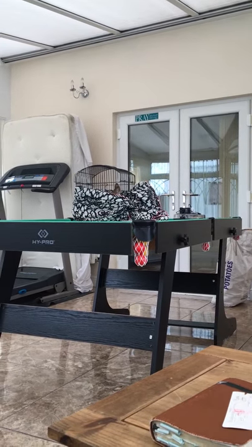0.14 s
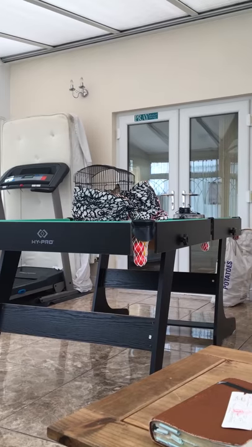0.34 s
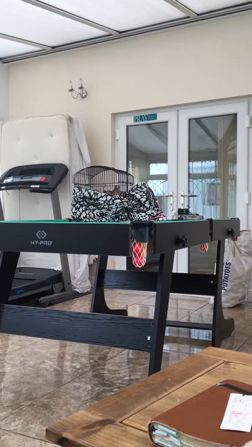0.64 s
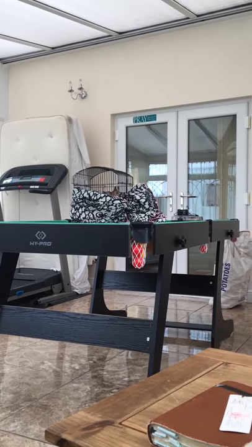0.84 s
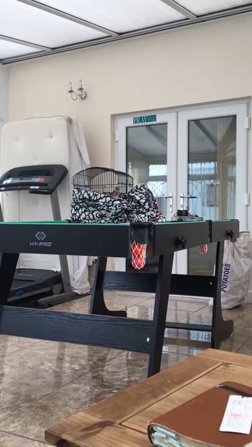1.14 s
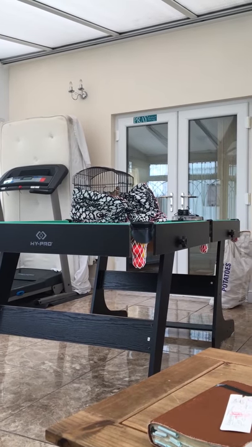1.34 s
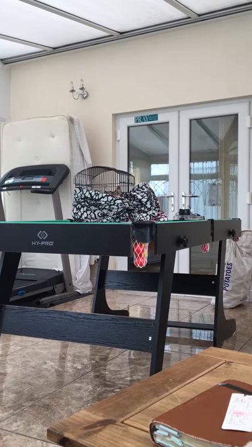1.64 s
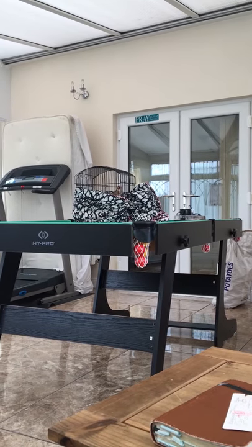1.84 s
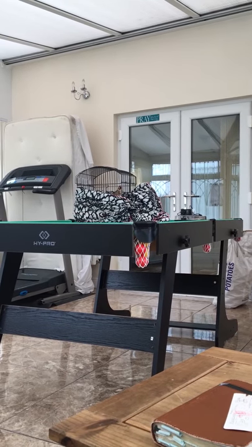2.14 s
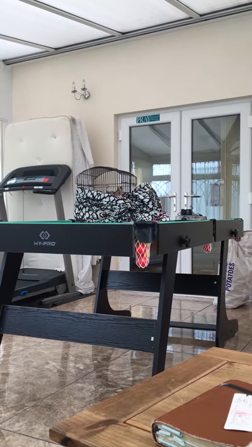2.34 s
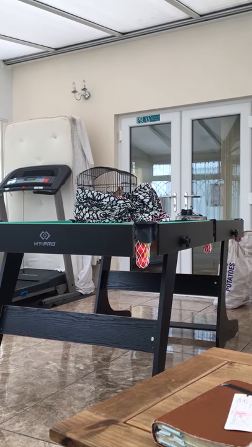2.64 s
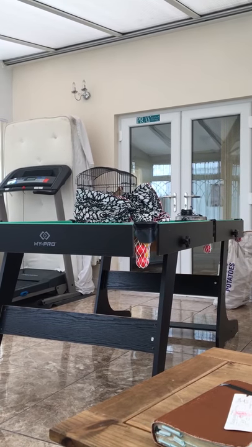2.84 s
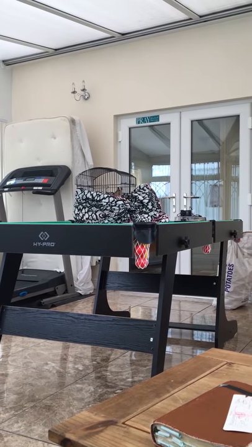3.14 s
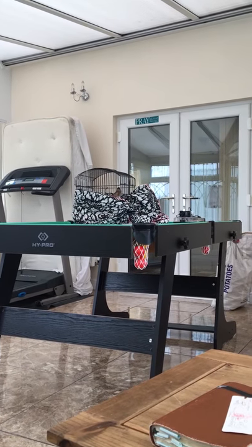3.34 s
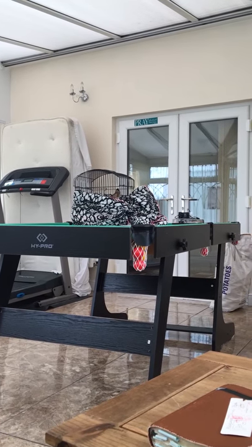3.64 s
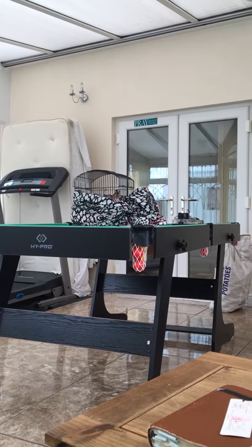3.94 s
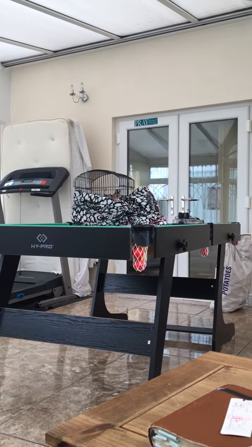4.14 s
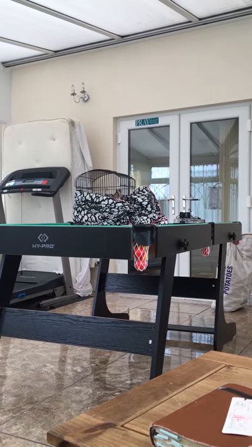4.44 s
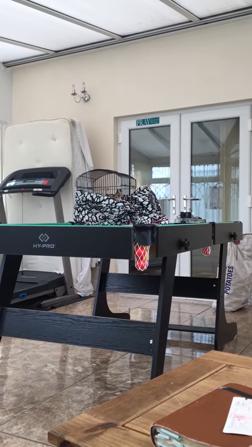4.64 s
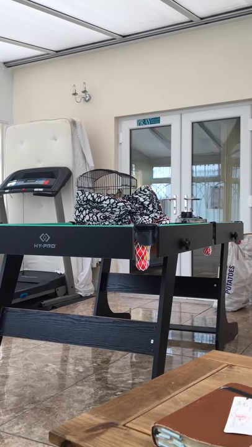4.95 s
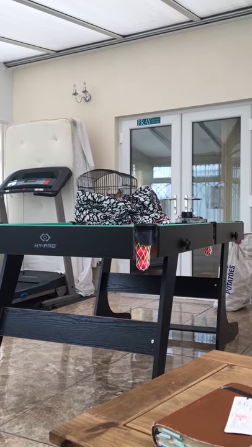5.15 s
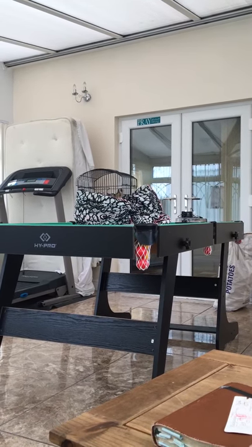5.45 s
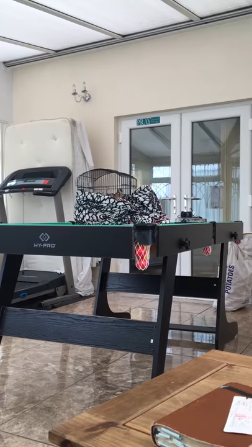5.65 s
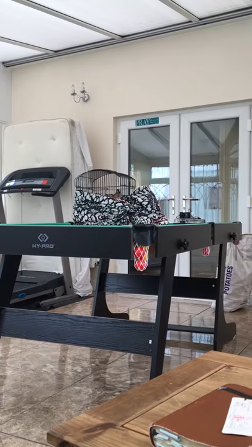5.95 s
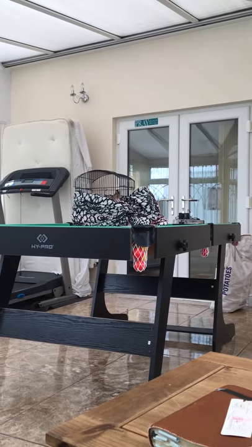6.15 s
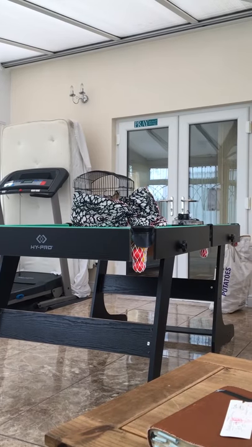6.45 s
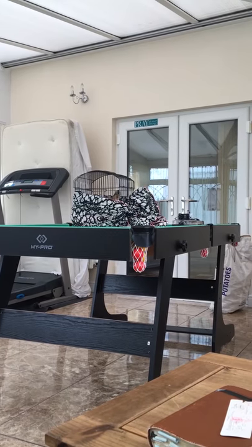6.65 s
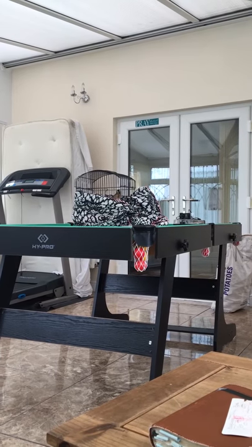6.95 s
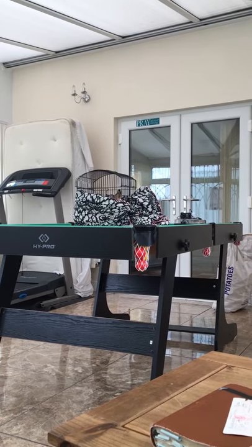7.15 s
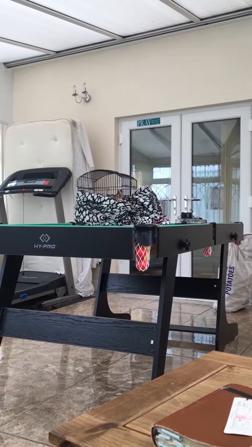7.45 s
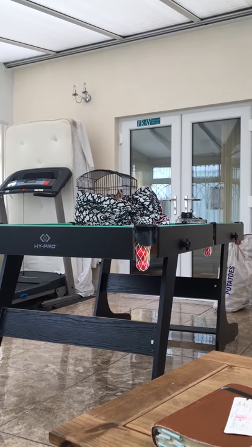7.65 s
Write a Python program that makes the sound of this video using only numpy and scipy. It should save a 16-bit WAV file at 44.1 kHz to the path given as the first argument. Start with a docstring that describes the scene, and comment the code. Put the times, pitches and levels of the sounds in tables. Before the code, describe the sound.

A caged finch sings quick chirps, twitters, trills and buzzes in a room, over a low rumble, with one dull knock.

```python
"""Caged goldfinch under a glass roof

A goldfinch sings a few metres from the microphone in a tiled, glass-roofed room. The two sides
of its syrinx, alone or together, give chirps, two-voiced notes, slurred whistles, a trill and
buzzes. Something knocks once across the room, over a low rumble and a faint hum."""
import sys
import numpy as np
from scipy import signal
from scipy.fft import rfft, irfft
from scipy.io import wavfile
from scipy.ndimage import map_coordinates

SR = 44100
rng = np.random.default_rng(int(sys.argv[2]) if len(sys.argv) > 2 else 0)


def to_wav(s):
    """Save 16-bit WAV."""
    ch = np.atleast_2d(s).T  # columns
    pcm = np.round(np.clip(ch, -1, 1) * 32767)  # PCM
    wavfile.write(sys.argv[1], SR, pcm.astype(np.int16))


N = 343098


# radiation from the bill: frequency_hz, gain_db
BILL_RADIATION = [(1000, 1.5), (1800, -4), (3000, -3.5), (4500, -2), (5500, 0), (7000, 1), (8600, -6),
                  (10500, 1.5), (12500, 4.5), (15500, -5)]

def finch():
    """The whole song close up, as it leaves the bill."""
    notes = trill(count=8) + churrs(count=5) + [(s, tumble()) for s in TUMBLE_STARTS]
    for syllable, table in ((chirp, CHIRP_NOTES), (pair, PAIR_NOTES), (slur, SLUR_NOTES),
                            (squawk, SQUAWK_NOTES), (twitter, TWITTER_CALLS), (buzz, BUZZ_NOTES)):
        notes += [(s, syllable(*row)) for s, *row in table]
    song = np.zeros(N)
    for s, sound in notes:
        add(song, s, sound)
    return coloured(song, BILL_RADIATION)


def membrane(hz, jitter):
    """A vibration with unsteady pitch, as of one side of the syrinx: a complex near sine."""
    unsteady_hz = hz * (1 + jitter * wander(len(hz), 700))
    return np.exp(2j * np.pi * np.cumsum(unsteady_hz) / SR)


def voice(wave, level_db, overtone_db, release_s=0.0048, third_db=-8, difference_db=-13):
    """Airflow distorts the vibration: overtones, and sum and difference tones when both sides sound."""
    power = abs(wave) ** 2
    difference = gain_of(difference_db) * (power - power.mean())
    third = gain_of(third_db) * wave ** 3 / (1 + power.mean())
    distortion = wave ** 2 + difference + third
    t = np.arange(len(wave)) / SR
    attack_s = min(.012, 0.24 * t[-1])
    ramp = np.clip(np.minimum(t / attack_s, (t[-1] - t) / release_s), 0, 1)
    gate = np.sin(np.pi / 2 * ramp) ** 2
    return np.sqrt(2) * gate * gain_of(level_db) * (wave + gain_of(overtone_db) * distortion).real


# one-voiced chirps and pips: start_s, length_s, start_hz, end_hz, level_db, swell_db
CHIRP_NOTES = [ (.025, .015, 2930, 5190, -50, 17.5), (0.113, 0.047, 2500, 4520, -53.5, 34),
               (0.476, 0.038, 2440, 4156, -45.5, 7), (0.593, 0.017, 3230, 4710, -36, 0),
               (0.638, 0.039, 8220, 7830, -49, -11), (1.603, .02, 1780, 3830, -45, 13),
               (1.633, 0.025, 2850, 3880, -36, 6.5), (1.71, 0.012, 2860, 2560, -44.5, 5),
               (1.812, 0.016, 1493, 4275, -40, 17), (1.824, 0.043, 3420, 4990, -32, -5.5),
               (1.937, 0.053, 2190, 3756, -45.5, 28), (2.025, 0.022, 1565, 6820, -40.5, 11.5),
               (2.231, 0.012, 5076, 5076, -21.5, 2), (2.292, .021, 2566, 4670, -32.5, 7),
               (2.432, 0.0052, 4630, 6760, -42.5, -16), (3.652, 0.017, 2180, 5100, -37.5, 19),
               (3.664, .029, 5486, 5512, -31, 11), (3.753, 0.044, 2005, 3310, -46, 20),
               (3.785, 0.024, 3150, 4760, -30.5, -2), (3.831, 0.02, 4800, 7740, -44.5, 0),
               (4.346, .04, 3340, 6670, -37.5, 0.5), (4.461, 0.026, 2680, 3717, -32.5, 2),
               (4.554, .11, 1970, 2490, -48.5, 8.5), (4.713, 0.016, 2940, 4800, -33.5, 5.5),
               (4.827, 0.0091, 1880, 5170, -35, 10), (5.08, 0.033, 5170, 5480, -36.5, -3),
               (5.492, 0.053, 2192, 3140, -39, -1), (5.58, 0.024, 2660, 4660, -32.5, -1.5),
               (5.8, 0.0407, 2360, 3220, -38, -0.5), (6.419, 0.045, 4630, 7580, -42.5, 1.5)]

def chirp(length_s, start_hz, end_hz, db, swell_db, overtone_db=-25.5):
    """A quick glide whose pitch follows breath: an even chirp moves early, a strongly swelling one late."""
    u = progress(length_s)
    hz = glide(u, start_hz, end_hz, bend=1.5 * 2 ** (-swell_db / 23.5))
    jitter = min(.002 + .05 * abs(np.log(end_hz / start_hz)), .028)  # wide glides are the roughest
    level_db = db + swell_db * (u - .5) + 2 * wander(len(u), 253)
    pressed_db = 22 * min(np.log2(end_hz / 4850), .35)  # higher chirps are pressed harder
    return voice(membrane(hz, jitter), level_db, overtone_db + pressed_db, release_s=0.0027)


# two-voiced notes: start_s, length_s, upper_start_hz, upper_end_hz, lower_start_hz, lower_end_hz,
# lower_relative_db, level_db, swell_db
PAIR_NOTES = [ (0.238, 0.037, 5660, 5890, 4140, 5080, 6.5, -55.5, -17),
              (0.375, .022, 4140, 5600, 3350, 4660, 3.5, -50, 6),
              (.686, 0.0504, 7500, 6350, 5930, 4924, 1.5, -43, 22.5),
              (1.529, 0.04, 7440, 6030, 5600, 4600, 2, -47, 15),
              (1.772, 0.014, 7300, 7200, 5600, 5750, 0, -49.5, -1),
              (4.766, 0.0245, 7770, 6550, 5580, 5600, -12, -39.5, 6),
              (5.629, 0.0497, 8640, 6340, 6560, 4930, -13, -37.5, 9),
              (5.732, 0.026, 5200, 5513, 4560, 4400, -4.5, -32, 4),
              (7.576, 0.022, 6470, 6870, 5910, 5910, -3.5, -42, 13),
              (7.695, 0.027, 5900, 6550, 4410, 5170, 6, -47, -3)]

def pair(length_s, start_hz, end_hz, low_start_hz, low_end_hz, low_db, db, swell_db,
         bend=2.56, overtone_db=-23):
    """Both sides of the syrinx glide at once; the lower is less steady and settles later."""
    u = progress(length_s)
    upper = membrane(glide(u, start_hz, end_hz, bend), jitter=0.0048)
    lower = membrane(glide(u, low_start_hz, low_end_hz, 0.65 * bend), jitter=0.0091)
    wave = upper + gain_of(low_db) * lower
    return voice(wave, db + swell_db * (u - .5), overtone_db, difference_db=-18)


# slurred whistles: start_s, length_s, start_hz, end_hz, bend, level_db, swell_db, warble_depth_hz
SLUR_NOTES = [(2.078, .126, 5730, 5088, 1.6, -29.5, 12.5, 5), (3.863, 0.091, 8730, 6235, 2.1, -37, 5.5, 66),
              (4.0, 0.13, 4490, 2627, .85, -36.5, -9, 233),
              (4.116, 0.16, 2568, 2290, 1.56, -45.5, -6.5, 395.5),
              (4.873, .088, 2315, 3670, 1.1, -47.5, -11, 237), (4.963, 0.074, 3530, 4750, 0.77, -34, 3, 68),
              (7.303, 0.11, 4250, 3896, 1.02, -34, 3, 5)]

def slur(length_s, start_hz, end_hz, bend, db, swell_db, depth_hz):
    """A whistle that slides one way under an arch of loudness."""
    u = progress(length_s)
    arch_db = -3 * (2 * u - 1) ** 2
    return whistle(glide(u, start_hz, end_hz, bend), db + swell_db * (u - .5) + arch_db, depth_hz)


def whistle(hz, db, depth_hz, warble_hz=211):
    """A long tone, pure or burred by a fast warble."""
    warble = membrane(np.full(len(hz), warble_hz), jitter=0.088).real
    tone = membrane(hz + depth_hz * warble, jitter=.0008)
    return voice(tone, db, overtone_db=-27.5, third_db=-5.5)


# a tumbling call, sung twice: start_s
TUMBLE_STARTS = [6.554, 6.777]
# its course: offset_s, pitch_hz, level_db, warble_depth_hz
TUMBLE_COURSE = [(0, 8620, -35.5, 398), (0.024, 6580, -39, 500), (0.059, 6500, -34.5, 462),
                 (0.094, 5720, -31, 435), (.101, 4490, -27.5, 149), (.117, 4070, -41, 150),
                 (0.136, 3280, -33.5, 233), (0.164, 2825, -45, 280)]

def tumble():
    """A burred whistle that falls in steps, from the high side of the syrinx to the low."""
    offset_s, *columns = np.transpose(TUMBLE_COURSE)
    t = np.arange(0, offset_s[-1], 1 / SR)
    hz, db, depth_hz = (np.interp(t, offset_s, column) for column in columns)
    return whistle(hz, db, depth_hz)


# harsh buzzes: start_s, length_s, sweep_rate_hz, throat_hz, throat_rise_hz, final_level_db, swell_db
BUZZ_NOTES = [(0.873, 0.091, 62, 5250, -150, -39, 9.5), (1.021, 0.11, 85, 5315, -47, -32.5, 13.5),
              (1.207, 0.084, 67, 5047, -4, -31.5, 8), (1.372, 0.088, 69, 5157, -100, -31, 9.5),
              (5.172, 0.25, 115, 5690, 598, -35, 11)]
# the throat's response: multiple_of_resonance, gain_db
THROAT_RESPONSE = [(.3, -33.5), (.5, -1.5), (.72, 3), (.9, 1.5), (1.1, 12), (1.3, -9.5), (1.5, -8.5),
                   (2, -14.5), (2.4, -24), (2.8, -24)]

def buzz(length_s, rate_hz, throat_hz, rise_hz, db, swell_db):
    """A raw tone swings up and down in pitch, sweeping its harmonics through the throat resonance."""
    u = progress(length_s)
    swing = (1 + membrane(np.full(len(u), rate_hz), jitter=.1).imag) / 2
    top_hz = throat_hz / 2.32
    hz = top_hz * (1 - .42 * (1 - swing))
    tone = membrane(hz, jitter=.022)
    resonance_hz = (throat_hz + rise_hz * u) * (1 + 0.23 * (swing - .75))  # the throat follows the pitch
    treble_db = 6 * (.6 - u)  # the high harmonics fade as the note fills out
    wave = np.zeros(len(u))
    for k in range(1, 8):
        throat_db = np.interp(k * hz / resonance_hz, *np.transpose(THROAT_RESPONSE))
        wave += gain_of(throat_db + treble_db * (k > 3)) * (tone ** k).real
    pressure = gain_of(9 * swing + 2 * wander(len(u), 90))
    envelope = gain_of(db + swell_db * (u - 1)) * signal.windows.tukey(len(u), .05)
    return envelope * unit_rms(wave * pressure)


# hoarse notes: start_s, length_s, upper_start_hz, upper_end_hz, lower_start_hz, lower_end_hz,
# lower_relative_db, level_db, swell_db, rasp_0_to_1, overtone_db
SQUAWK_NOTES = [(2.357, .04, 6000, 8940, 3100, 4540, 1.5, -39.5, -5, 0.82, -26.5),
                (2.456, 0.13, 4600, 4123, 3380, 2270, -13.5, -40, -8, 0.25, -3),
                (3.278, 0.075, 5700, 5110, 4590, 3620, -4.5, -44.5, -7, 0.6, -23),
                (3.321, 0.19, 4866, 4060, 3544, 2818, -1.5, -45, -1.5, .52, -8),
                (3.604, 0.047, 4800, 3950, 2473, 1950, 4.5, -53, 1, .2, -21.5),
                (7.262, 0.042, 5600, 7740, 2595, 3850, 9.5, -59, -19, 1, -16.5)]

def squawk(length_s, start_hz, end_hz, low_start_hz, low_end_hz, low_db, db, swell_db,
           rasp, overtone_db, flutter_hz=528):
    """The membranes slap unevenly, which spreads rough sidebands around both voices."""
    u = progress(length_s)
    upper = membrane(glide(u, start_hz, end_hz, bend=1.3), jitter=.028 * rasp)
    lower = membrane(glide(u, low_start_hz, low_end_hz, bend=1.3), jitter=0.07 * rasp)
    slap = membrane(np.full(len(u), flutter_hz), jitter=.14)
    chop = unit_rms(1 + rasp * (slap + .5 * slap ** 2).real)
    return chop * voice(upper + gain_of(low_db) * lower, db + swell_db * (u - .5), overtone_db,
                        release_s=.012, third_db=-15, difference_db=-18)


# a run of three-note twitters: start_s, level_db, nasal_pitch_hz
TWITTER_CALLS = [(5.877, -35.5, 4050), (6.014, -33.5, 4180), (6.146, -34, 4104), (6.281, -32, 4124)]

def twitter(db, nasal_hz):
    """An upward flick, a two-voiced fall, then a nasal note."""
    flick = chirp(length_s=.013, start_hz=3810, end_hz=6610, db=db, swell_db=0, overtone_db=-32.5)
    fall = pair(length_s=.041, start_hz=6620, end_hz=4970, low_start_hz=3660, low_end_hz=3180,
                low_db=-3, db=db - 4, swell_db=9, bend=0.8, overtone_db=-26)
    nasal = squawk(length_s=0.0403, start_hz=1.06 * nasal_hz, end_hz=nasal_hz,
                   low_start_hz=.655 * nasal_hz, low_end_hz=.6 * nasal_hz, low_db=-14.5,
                   db=db, swell_db=8.5, rasp=0.31, overtone_db=-23, flutter_hz=848)
    out = np.zeros(SR // 5)
    for offset_s, note in ((0, flick), (.025, fall), (.069, nasal)):
        add(out, offset_s, note)
    return out


def trill(count, start_s=2.665, period_s=.0717):
    """Strokes at a steady beat, as (start_s, sound)."""
    return [(start_s + k * period_s, trill_stroke()) for k in range(count)]


def trill_stroke():
    """A high flick from one side, answered at once by a lower, hollow one from the other."""
    out, u = np.zeros(SR // 20), progress(0.0236)
    high_drift, low_drift, effort = rng.standard_normal(3)  # no two strokes quite alike
    tune = 1 + .012 * high_drift
    add(out, 0, chirp(length_s=.013, start_hz=8500 * tune, end_hz=6600 * tune,
                      db=-38.5 + 1.3 * effort, swell_db=-4, overtone_db=-28))
    answer = membrane((1 + 0.0087 * low_drift) * glide(u, 4170, 2984, bend=1.56), jitter=0.026)
    add(out, .013, voice(answer, level_db=-32 + 4 * (u - .5), overtone_db=-32, third_db=5))
    return out


def churrs(count, start_s=7.004, period_s=.0465):
    """Churrs at a steady beat, each a little louder, as (start_s, sound)."""
    return [(start_s + k * period_s, churr(db=-47 + 0.7 * k)) for k in range(count)]


def churr(db):
    """A low falling note in two voices, chopped into a rasp by a flutter."""
    u = progress(.034)
    fall = 1 - 0.29 * u
    upper = membrane(4900 * fall, jitter=0.018)
    lower = membrane(2500 * fall, jitter=0.046)
    flutter = 1 + 0.51 * membrane(620 * fall, jitter=0.037).real
    return flutter * voice(upper + gain_of(-0.5) * lower, db - 6 * u, overtone_db=-29)


# one knock and its rattle, across the room: start_s, level_db
KNOCK_HITS = [(3.929, -40), (3.939, -31.5), (3.956, -43.5)]
# the noise of each hit: frequency_hz, gain_db
KNOCK_SPECTRUM = [(50, -33), (110, -9), (300, -1), (550, -3.5), (850, 1.5), (1110, 2), (1500, -3),
                  (2400, -5.5), (3500, -15), (7000, -21.5), (13000, -25.5), (16000, -30)]
# modes rung by the loudest hit: pitch_hz, level_db, t60_s
KNOCK_RINGING = [(167, -58, 0.38), (305, -49, 0.28), (890, -67, 0.24), (1130, -64, 0.76), (1436, -56, 0.22)]

def knock(puff_t60_s=0.047):
    """A dull blow with a short rattle: puffs of noise and a few ringing modes."""
    out, t = np.zeros(N), np.arange(SR // 2) / SR
    for s, db in KNOCK_HITS:
        puff = unit_rms(coloured(rng.standard_normal(len(t)), KNOCK_SPECTRUM))
        add(out, s, gain_of(db - 60 * t / puff_t60_s) * puff)
    blow_s = KNOCK_HITS[1][0]
    for hz, db, t60_s in KNOCK_RINGING:
        add(out, blow_s, gain_of(db - 60 * t / t60_s) * np.sin(2 * np.pi * hz * t))
    return out


# reflections reaching the microphone off table, wall, glass, floor and roof: delay_s, relative_db
REFLECTIONS = [(.0023, -15.5), (.0051, -8.5), (.0087, -16.5), (0.012, -6), (0.018, -8.5)]
# decay of the tiled room: frequency_hz, t60_s
ROOM_DECAY = [(200, 0.55), (1000, 0.38), (3000, 0.4), (5000, 0.33), (8000, 0.31), (14000, 0.2)]

def room(x, direct_db, wet_db):
    """The way to the microphone: direct sound, reflections from hard surfaces and a diffuse tail."""
    taps = np.zeros(SR)
    slots = np.arange(200, SR - 20, 20)  # one echo of random sign in every 20 samples
    taps[slots + rng.integers(0, 20, len(slots))] = rng.choice([-1., 1.], len(slots))
    hz, t, bands = signal.stft(taps, SR, nperseg=256)
    decay = gain_of(-60 * t / value_at(ROOM_DECAY, hz)[:, None])
    _, tail = signal.istft(bands * decay, SR, nperseg=256)
    response = gain_of(wet_db) * tail / np.linalg.norm(tail)
    for delay_s, db in [(0.00052, 0)] + REFLECTIONS:
        add(response, delay_s, gain_of([direct_db + db]))
    return signal.fftconvolve(x, response)[:N]


# room tone at the microphone: frequency_hz, gain_db
RUMBLE_SPECTRUM = [(20, -51), (38, 5), (110, 0), (160, -1.5), (250, -5), (370, -8.5), (500, -16.5),
                   (900, -19.5), (1090, -18), (1350, -25), (3000, -31), (8000, -36), (12000, -37.5),
                   (15500, -41)]

def rumble(level_db=-55.5):
    """The room's low rumble and hiss, swelling a little."""
    swell = gain_of(level_db + 0.27 * wander(N, 5))
    return swell * unit_rms(coloured(rng.standard_normal(N), RUMBLE_SPECTRUM))


# faint hum in the background: pitch_hz, level_db
HUM_TONES = [(102.3, -64.5), (140, -69), (199.2, -64)]

def hum():
    """Three low tones, each wavering in level and pitch."""
    out = np.zeros(N)
    for hz, db in HUM_TONES:
        level = gain_of(db + 2 * wander(N, 2.61))
        wavering_hz = hz + 1.235 * wander(N, 4.8)
        out += level * unit_rms(np.sin(2 * np.pi * np.cumsum(wavering_hz) / SR))
    return out


def glide(u, start_hz, end_hz, bend):
    """Pitch moves to its goal: straight for a bend of 1, early for more, late for less."""
    return end_hz + (start_hz - end_hz) * (1 - u) ** max(bend, .1)


def progress(length_s):
    """Runs from 0 to 1 over a note."""
    return np.linspace(0, 1, max(round(length_s * SR), 64))


def wander(n, rate_hz):
    """Smooth random drift of about unit size."""
    at = np.arange(n) * rate_hz / SR
    return map_coordinates(rng.standard_normal(1024), [at], order=3, mode="wrap")


def gain_of(db):
    """Decibels to amplitude."""
    return 10 ** (np.asarray(db) / 20)


def unit_rms(x):
    """Scales to rms 1."""
    return x / np.sqrt(np.mean(x ** 2) + 1e-20)


def value_at(points, hz):
    """Reads a table on a log-frequency axis."""
    table_hz, value = np.transpose(points)
    return np.interp(np.log(hz + 1), np.log(table_hz + 1), value)


def coloured(x, spectrum):
    """Filters by a table of frequency_hz, gain_db."""
    hz = np.fft.rfftfreq(len(x), 1 / SR)
    return irfft(rfft(x) * gain_of(value_at(spectrum, hz)), len(x))


def add(mix, start_s, sound):
    """Mixes a sound in at start_s."""
    part = mix[max(round(start_s * SR), 0):][:len(sound)]
    part += sound[:len(part)]


def scene():
    """One microphone: the bird a few metres off, the knock across the room, rumble and hum behind."""
    bird = room(finch(), direct_db=-2.5, wet_db=-2.5)
    far_knock = room(knock(), direct_db=2, wet_db=3.5)
    return (bird + far_knock + rumble() + hum())[None]


def record(dry):
    """The recorder's band limit takes off the highest treble."""
    cutoff_hz = 15780
    lowpass = signal.firwin(511, cutoff_hz, window=("kaiser", 9), fs=SR)
    return signal.oaconvolve(dry, lowpass[None], "same")


dry = scene()
out = record(dry)
to_wav(out)
```